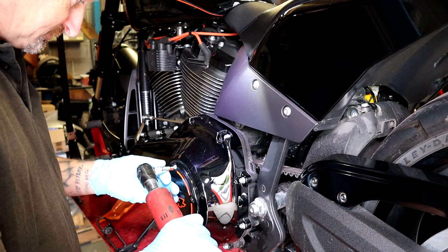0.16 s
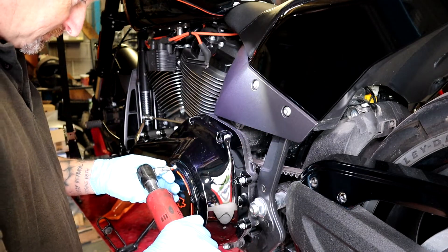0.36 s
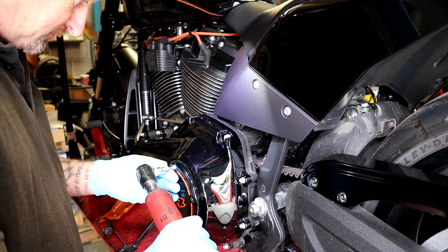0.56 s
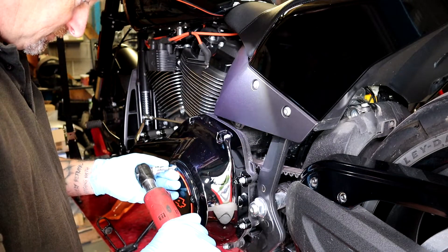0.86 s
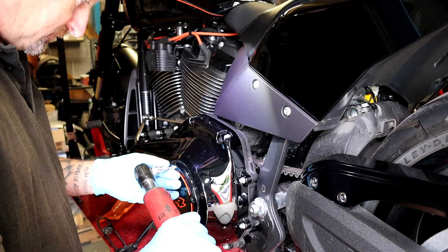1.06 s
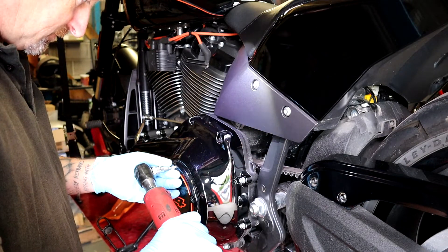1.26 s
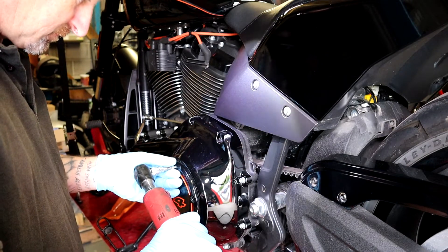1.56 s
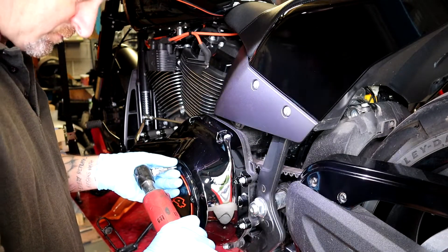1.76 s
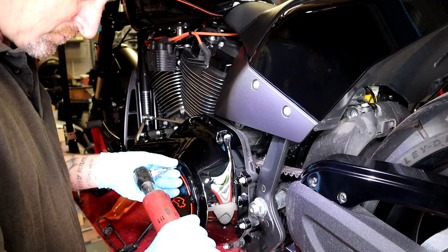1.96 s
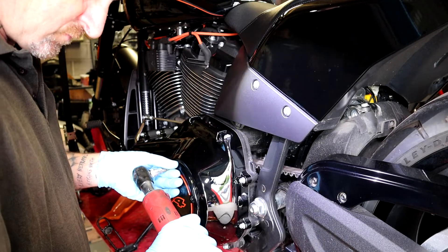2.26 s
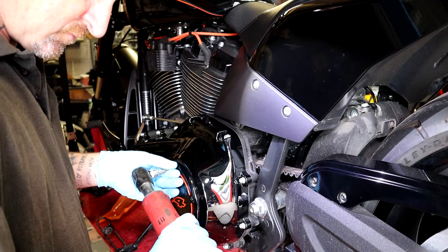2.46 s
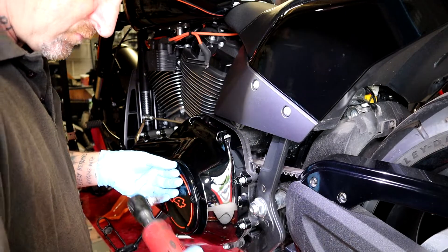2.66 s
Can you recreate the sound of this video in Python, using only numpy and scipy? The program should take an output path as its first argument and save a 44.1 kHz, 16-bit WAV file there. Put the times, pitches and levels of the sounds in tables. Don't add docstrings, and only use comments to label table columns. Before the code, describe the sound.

A cordless electric ratchet, close to a camera microphone in a garage. Low room drone, a tiny high squeal at 0.09 seconds, then loose knocks and a metallic shudder at 0.12. A harsh grinding buzz with fast clacks, over fifty per second, climbs to its highest around 0.9, sags by 1.5, rises slightly near 2.3. It cuts off at 2.55; two faint knocks, short reverberation, drone.

```python
import sys
import numpy as np
from scipy import signal
from scipy.fft import rfft, irfft
from scipy.io import wavfile
from scipy.ndimage import uniform_filter1d

SR = 44100
rng = np.random.default_rng(int(sys.argv[2]) if len(sys.argv) > 2 else 0)


def gain_from_db(level_db):
    decades = np.asarray(level_db, float) / 20
    return 10 ** decades


def int16_out(signal):
    q = np.round(np.clip(np.atleast_2d(signal).T, -1, 1) * 32767)
    wavfile.write(sys.argv[1], SR, q.astype(np.int16))


N = 123479
T = np.arange(N) / SR
ON_S, OFF_S = .118, 2.556

# frequency in Hz, level in dB per Hz.
DRONE = [(30, -51), (200, -18), (500, -18.5), (620, -5), (1050, -5), (1300, -16.5), (3500, -20.5),
         (6000, -46)]
# time in seconds, speed in turns per second.
CRANK_SPEED = [(.17, 48.85), (.3, 54.69), (.45, 53.79), (.56, 58.98), (.68, 67.9), (.8, 76.36),
               (.92, 76.59), (1.05, 65.2), (1.2, 55.22), (1.36, 52.19), (1.5, 49.87), (1.6, 54.03),
               (1.75, 54.95), (1.95, 56.77), (2.1, 57.72), (2.28, 63.58), (2.42, 59.35), (2.55, 53.55)]
# time in seconds, level in dB.
EFFORT = [(.12, -12), (.19, -14.5), (.24, -15.5), (.45, -15.5), (.56, -13.5), (.66, -16), (.74, -14.5),
          (.92, -16.5), (1.2, -19), (1.36, -21), (1.5, -20.5), (1.6, -20.5), (1.75, -19.5), (1.95, -19),
          (2.1, -19), (2.28, -17.5), (2.42, -18.5), (2.55, -22)]
# frequency in Hz, level in dB per Hz.
GEARS = [(60, -64), (290, -48.5), (500, -19.5), (1480, -10.5), (2530, -6), (10000, -30), (11600, -26),
         (15500, -55)]
# frequency in Hz, level in dB per Hz.
SCRAPE = [(300, -47), (500, -12.5), (1460, -11), (2520, -6.5), (5500, -5), (10000, -21), (11500, -17.5),
          (15500, -30)]
# frequency in Hz, width in Hz, level in dB.
HEAD_MODES = [(512, 13, -10), (737, 47, 4), (912, 180, 1.5), (1914, 86, -1.5), (2156, 56, -5),
              (2617, 150, -6), (3960, 120, 1), (4630, 40, 3)]
# frequency in Hz, level in dB, t60 in seconds.
CLACK_MODES = [(2050, -4, .022), (2450, 0, .025), (2800, -1, .014), (3600, 0, .011), (4300, 0, .009),
               (5000, -2, .007), (6000, -8, .005), (7500, -14, .003)]
# multiple of the crank speed, level in dB.
CRANK_ORDERS = [(1, 0), (2, -4), (3, -2), (4, -1), (4.38, -1), (5, -12), (6, 2), (7, 0), (8, -2), (9, 0),
                (10, 0), (11, 0), (12, 0), (13, -2), (15, -4)]
# frequency in Hz, level in dB.
COVER_HUM = [(50, -60), (150, -60), (230, -45), (310, -44), (370, -38), (500, -28), (580, -33), (1000, -32)]
# frequency in Hz, level in dB per Hz.
SHUDDER = [(25, -26), (300, 6), (600, 11.5), (900, 22), (1400, -12), (3200, 25), (4200, -72)]
# start in seconds, rattle length in seconds, rattle level in dB, clack level in dB.
KNOCKS = [
    (.119, .010, -13, -17),
    (.148, .016, -17, -15),
    (.170, .012, -19, -12),
    (2.577, .011, -33, -24),
    (2.606, .003, -33, -33),
]
# frequency in Hz, t60 in seconds.
ROOM = [(200, 0.3), (1000, 0.27), (3000, 0.45), (6000, 0.37), (12000, 0.21)]
# centre in seconds, range kept below the loudest bin in dB.
THINNED = [
    (0.538, 16),
    (0.587, 19),
    (1.536, 25),
    (1.794, 18),
    (2.095, 21),
    (2.512, 23),
]


def evened(x):
    return x / np.sqrt(np.mean(x ** 2) + 1e-20)


def read(points, hz):
    f, value = np.transpose(points)
    return np.interp(np.log(hz + 1), np.log(f + 1), value)


def colour(x, points, peaks=()):
    hz = np.abs(np.fft.fftfreq(4096, 1 / SR))
    lift = 1 + sum(gain_from_db(db) / (1 + (2 * (hz - f) / width) ** 2) for f, width, db in peaks)
    log_gain = np.log(gain_from_db(np.maximum(read(points, hz), -100)) * lift)
    taps = np.fft.ifft(np.exp(np.conj(signal.hilbert(log_gain)))).real[:2048]
    return evened(signal.oaconvolve(x, taps)[:len(x)])


def slow(rate_hz):
    width = int(SR / rate_hz)
    return evened(uniform_filter1d(uniform_filter1d(rng.standard_normal(N), width), width))


def add(mix, s, sound):
    part = mix[round(s * SR):][:len(sound)]
    part += sound[:len(part)]


def drone():
    duck_db, duck_s, recover_db_per_s = -10, .02, 2
    duck = duck_db * np.clip((T - ON_S + duck_s) / duck_s, 0, 1)
    duck += recover_db_per_s * np.maximum(T - OFF_S, 0)
    lumps = gain_from_db(-30) * colour(rng.standard_normal(N) * gain_from_db(1.8 * slow(40)), DRONE)
    hiss = gain_from_db(-82) * rng.standard_normal(N)
    mains = gain_from_db(-63 + 4.5 * slow(9.8)) * np.sin(2 * np.pi * 118 * T)
    rumble = gain_from_db(-68) * colour(rng.standard_normal(N), [(25, 0), (120, -8), (400, -22)])
    return gain_from_db(duck) * (lumps + hiss) + mains + rumble


def trigger_squeal():
    out, length_s, hz = np.zeros(N), .026, 7750
    t = np.arange(0, length_s, 1 / SR)
    swell = np.sin(np.pi * t / length_s) ** .3
    add(out, .086, gain_from_db(-53) * swell * np.sin(2 * np.pi * hz * t))
    return out


def crank():
    speed = np.interp(T, *np.transpose(CRANK_SPEED))
    turns = np.cumsum(speed) / SR
    turns += .496 - np.interp(CRANK_SPEED[0][0], T, turns)
    return speed, turns


def gears():
    return colour(rng.standard_normal(N) * gain_from_db(.5 * slow(133)), GEARS, HEAD_MODES)


def teeth():
    per_s, spread_db = 12000, 2.6
    size = gain_from_db(spread_db * np.minimum(rng.exponential(1, N), 5)) * rng.choice([-1., 1.], N)
    return size * (rng.random(N) < per_s / SR)


def scrape(speed, turns):
    start, end, edge = .58, 1.08, .03
    angle = (turns + .017 * slow(60) - .2) % 1 + .2
    opening = 1 + np.tanh((angle - start) / edge)
    closing = 1 - np.tanh((angle - end) / edge)
    rise_db = 2 * (angle - 1) / .4
    stroke = .25 * opening * closing * gain_from_db(rise_db + 1.4 * slow(200))
    reverse_db = -13 + .45 * (speed - 47) + 3.6 * slow(50)
    stroke += gain_from_db(reverse_db) * np.exp(-((angle - .4) / .09) ** 2)
    return colour(teeth() * stroke, SCRAPE, HEAD_MODES)


def clack(draw):
    t, (hz, db, t60) = T[:1500, None], np.transpose(CLACK_MODES)
    tune, weight, phase = draw.reshape(3, -1)
    ring = np.sin(2 * np.pi * hz * (1 + .035 * tune) * t + .6 * phase)
    modes = gain_from_db(db + 2 * weight - 60 * t / t60) * ring
    return modes.sum(1) * np.minimum(t[:, 0] / .0004, 1)


def clacks(turns):
    blows = np.zeros(N)
    draws = rng.standard_normal((199, 2 + 3 * len(CLACK_MODES)))
    times = np.interp(np.arange(199) + 1.02, turns - np.floor(turns[0]), T)
    for s, d in zip(times, draws):
        level = (s > ON_S + .01) * gain_from_db(2 * np.clip(d[1], -3, 1))
        late_s = .017 * d[0] / 58
        add(blows, max(s + late_s, 0), level * clack(d[2:]))
    return evened(blows)


def crank_hum(speed, turns):
    hum = np.zeros(N)
    for k, db in CRANK_ORDERS:
        level = gain_from_db(db + read(COVER_HUM, k * speed) + 3 * slow(9))
        hum += level * np.sin(2 * np.pi * (k * turns + rng.random()))
    return hum


def ratchet():
    takeup_s, takeup_db, stop_db_per_s = .015, -10, 1500
    speed, turns = crank()
    tool = gain_from_db(-5.5) * gears() + gain_from_db(-4) * scrape(speed, turns)
    tool += gain_from_db(-4) * clacks(turns) + 2 * crank_hum(speed, turns)
    fade_in = takeup_db - 400 * (ON_S - T) - 900 * np.maximum(ON_S - takeup_s - T, 0)
    takeup = np.where(T < ON_S, fade_in, 0)
    stop = -stop_db_per_s * np.maximum(T - OFF_S, 0)
    return tool * gain_from_db(np.interp(T, *np.transpose(EFFORT)) + takeup + stop)


def screw_breaks_loose():
    out, t = np.zeros(N), T[:9000]
    add(out, ON_S, gain_from_db(-17 - 60 * t / .85) * colour(rng.standard_normal(len(t)), SHUDDER))
    jolt = np.minimum(t / .004, 1) * np.sin(2 * np.pi * 509 * t)
    add(out, .13, gain_from_db(-16.5 - 60 * t / .22) * jolt)
    return out


def loose_knocks():
    out, rattle = np.zeros(N), colour(teeth(), SCRAPE, HEAD_MODES)
    for s, length, db, clack_db in KNOCKS:
        fade = np.exp(-(np.maximum(T - s - length, 0) / .00098) ** 2)
        out += gain_from_db(db) * rattle * (T > s) * fade
        add(out, s + length, gain_from_db(clack_db) * clack(rng.standard_normal(3 * len(CLACK_MODES))))
    return out


def garage(x):
    taps = np.zeros(SR)
    at = np.arange(300, SR - 20, 20)
    taps[at + rng.integers(0, 20, len(at))] = rng.choice([-1., 1.], len(at))
    hz, t, z = signal.stft(taps, SR, nperseg=256)
    tail = signal.istft(z * gain_from_db(-60 * t / read(ROOM, hz)[:, None]), SR, nperseg=256)[1]
    return signal.fftconvolve(x, tail / np.linalg.norm(tail))[:N]


def scene():
    room = drone()
    tool = trigger_squeal() + ratchet() + screw_breaks_loose() + loose_knocks()
    return (room + tool + gain_from_db(-12.5) * garage(tool))[None]


def thin_out(x):
    size = 1536
    window, hz = signal.windows.tukey(size, 1) ** .5, np.fft.rfftfreq(size, 1 / SR)
    lift = gain_from_db(14 * np.exp(-((hz - 12200) / 400) ** 2))
    for s, keep_db in THINNED:
        at = round(s * SR) - size // 2
        z = rfft(x[at:at + size] * window)
        strength = abs(z) * lift / abs(z).max() * gain_from_db(keep_db)
        weak = 1 / (1 + strength ** 8)
        add(x, at / SR, -window * irfft(z * weak))
    return x


def roll_off(x):
    return signal.sosfilt(signal.butter(12, 15780, fs=SR, output="sos"), x)


def record(dry):
    x, knee, room = dry[0], .86, .12
    clipped = np.sign(x) * (knee + room * np.tanh((abs(x) - knee) / room))
    x = np.where(abs(x) < knee, x, clipped)
    x = signal.lfilter(*signal.butter(2, 35, "high", fs=SR), x)
    x = signal.oaconvolve(x, signal.firwin(1023, 15760, window=("kaiser", 9), fs=SR), "same")
    mix = thin_out(x)[None]
    return roll_off(mix)


dry = scene()
out = record(dry)
int16_out(out)
```